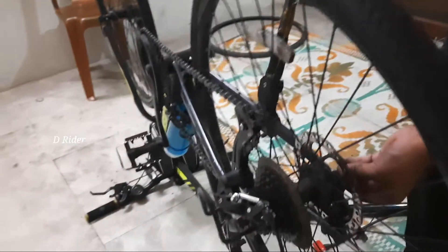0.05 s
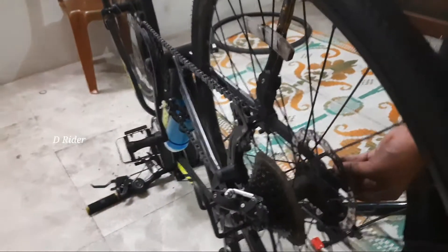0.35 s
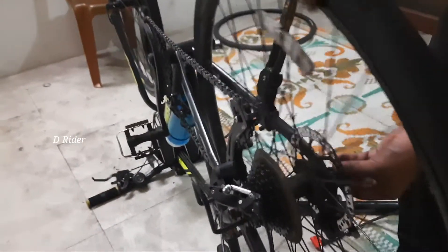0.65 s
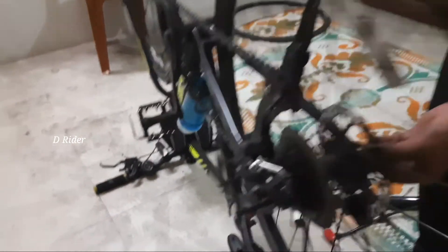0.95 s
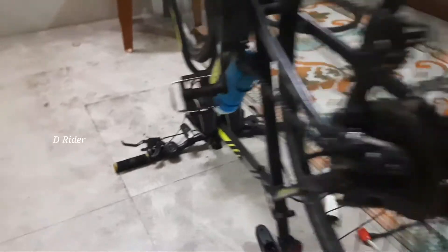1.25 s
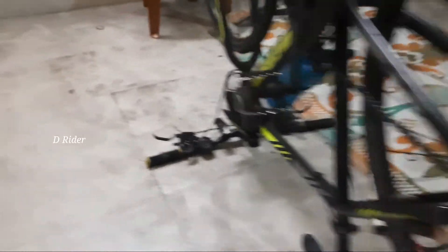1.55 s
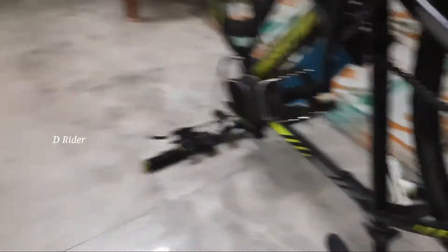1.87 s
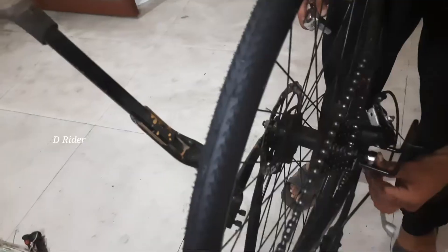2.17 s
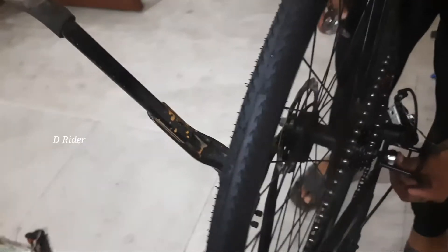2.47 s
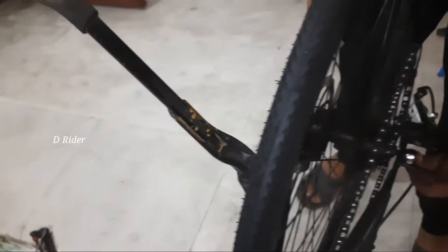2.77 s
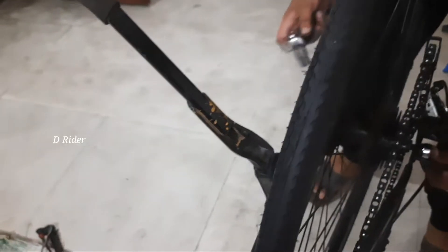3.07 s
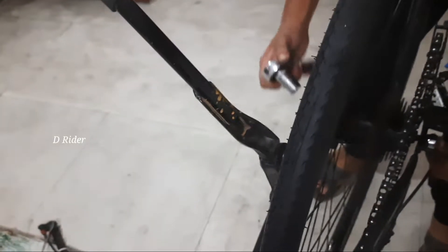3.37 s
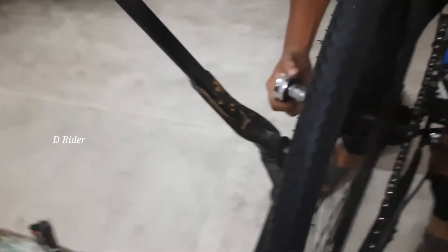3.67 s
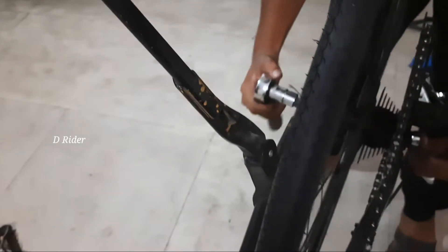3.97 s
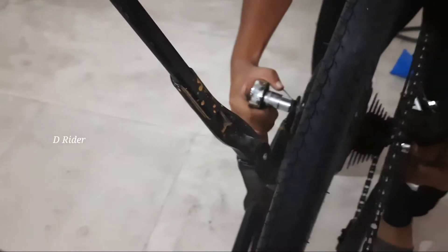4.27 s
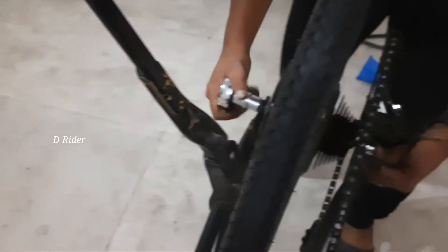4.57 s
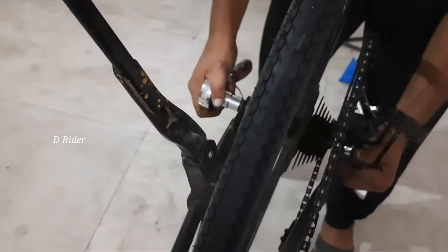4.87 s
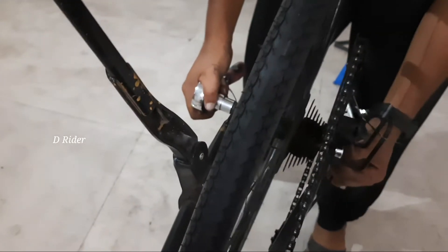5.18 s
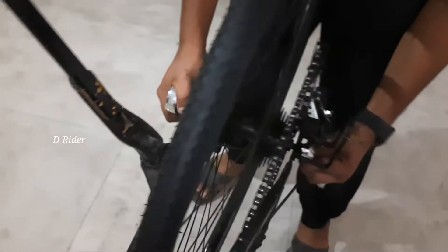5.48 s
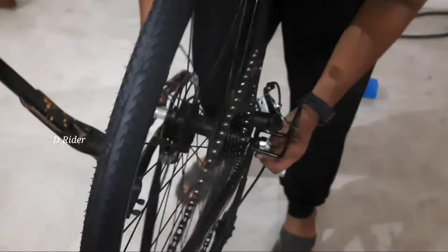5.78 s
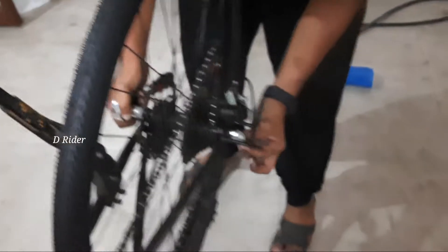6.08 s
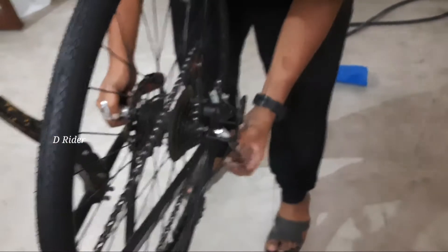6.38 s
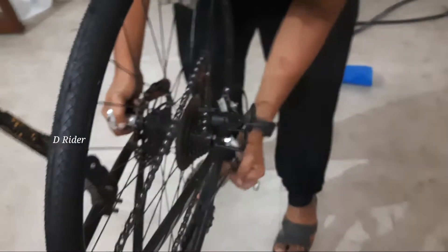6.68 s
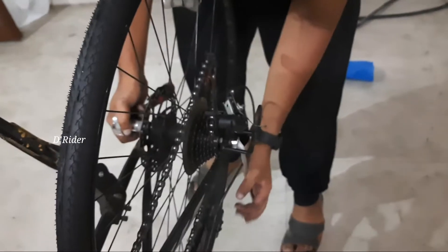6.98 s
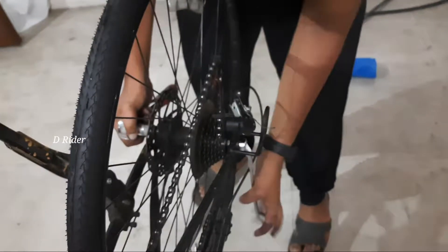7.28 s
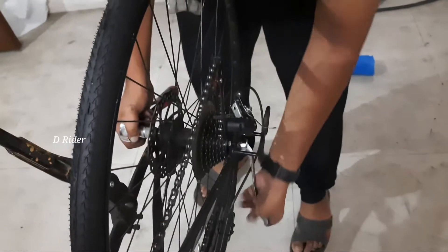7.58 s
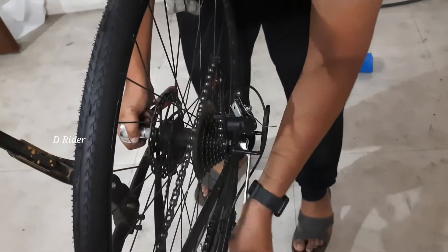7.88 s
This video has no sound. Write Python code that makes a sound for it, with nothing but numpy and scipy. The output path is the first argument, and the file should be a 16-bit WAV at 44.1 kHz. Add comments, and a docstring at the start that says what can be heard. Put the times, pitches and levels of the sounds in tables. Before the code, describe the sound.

Several crisp chain clicks sound near the microphone over a low hum, as hands and tyre rub faintly along a bicycle frame. Traffic rises in the background with a booming motor tone that swells and fades. The axle then lands with a quick cluster of ringing steel knocks, echoing off hard walls. Later the chain and axle click once more beneath the continuing rumble.

```python
"""A rear wheel is worked into an upturned bicycle in a bare, tiled room.
From the start a motor drones behind it, probably traffic outside; the brake disc sings on its pads,
hands and tyre rub along the frame and the chain ticks over the sprockets. After two seconds a broad
rush of traffic swells. Near 3.6 s the axle clacks hard into the frame, and at 6.5 s chain and axle
click once more while the drone goes on."""
import sys
import numpy as np
from scipy import signal
from scipy.fft import rfft, irfft, next_fast_len
from scipy.io import wavfile

SR = 44100
rng = np.random.default_rng(int(sys.argv[2]) if len(sys.argv) > 2 else 0)


def wav_out(sig):
    """Save sig, one row per channel (or a flat mono array), as 16-bit PCM at SR to the path in sys.argv[1]."""
    wavfile.write(sys.argv[1], SR, np.round(np.clip(np.atleast_2d(sig).T, -1, 1) * 32767).astype(np.int16))


N = 354563
T = np.arange(N) / SR
PADDED = next_fast_len(N, real=True)

# the quiet room's tone colour (how strong each pitch is): f/Hz, level/dB
QUIET_COLOUR = [(25, -11), (60, -9.5), (110, 5.5), (170, -4), (260, 0), (380, -4), (560, -11), (760, -16),
                (1050, -11.5), (1500, -21), (2200, -25), (3000, -36), (5000, -44), (15000, -46)]
# its loudness: t/s, level/dB
QUIET_LEVEL = [(0, -45), (1.0, -44), (1.6, -46), (2.0, -47), (8.04, -49)]
# how much noise differs between the ears: f/Hz, unshared minus shared/dB
STEREO_WIDTH = [(60, -14.5), (200, -9), (380, -8), (700, -1.5), (1290, 2), (2400, -0.5), (15000, 0.5)]
# the motor's working cycles per second: t/s, f/Hz
MOTOR_SPEED = [(0, 33.17), (.7, 34.44), (1.2, 35.35), (2.0, 36.5), (2.3, 32.43), (2.9, 32.7), (3.2, 33.84),
               (4.1, 34.64), (5.35, 35.52), (5.8, 34.42), (6.6, 33.33), (8.04, 33.19)]
# the tone at 4 times that speed booms in the room: t/s, level/dB
BOOM_LEVEL = [(0, -53), (2.13, -67), (2.35, -30), (3.05, -30.5), (3.4, -21), (3.53, -29), (3.66, -23.5),
              (4.02, -30), (4.3, -23.5), (4.52, -33.5), (4.68, -24.5), (5.45, -17), (5.67, -23.5),
              (5.8, -20), (6.12, -19), (6.23, -28.5), (6.58, -28.5), (7.05, -45), (7.35, -33.5)]
# the tone at 6 times that speed comes and goes: t/s, level/dB
OVERTONE_LEVEL = [(0, -60), (.55, -50.5), (.96, -43.5), (1.63, -57.5), (2.7, -45), (3.9, -43.5),
                  (4.65, -33.5), (5.9, -53.5), (6.7, -40.5), (8.04, -35.5)]
# weaker motor tones: multiple of the speed, level against RUSH_LEVEL/dB
WEAK_TONES = [(3, -9), (5, -11), (7, -12), (8, -12), (9, -13.5)]
# standing waves, pitches at which the room boosts those weaker tones: f/Hz, width/Hz, boost/dB
STANDING_WAVES = [(109, 1.8, 17), (164.5, 3.5, 7.5)]
# pitch of a deeper hum: t/s, f/Hz
HUM_PITCH = [(0, 63.3), (1.6, 61.65), (3.1, 62.45), (3.6, 69.1), (5.3, 69.74), (6.7, 66.8), (8.04, 68.02)]
# its loudness: t/s, level/dB
HUM_LEVEL = [(0, -38.5), (.13, -42), (.42, -55), (.75, -56), (1.6, -44), (1.72, -59), (2.15, -50),
             (2.43, -27), (2.68, -40), (3.12, -32), (3.26, -39.5), (4.6, -39), (5.33, -43), (5.58, -33.5),
             (6.96, -28.5), (7.12, -35.5), (7.6, -25), (8.04, -43)]
# brake disc squeals: t/s, length/s, first f/Hz, last f/Hz, rise in the middle/Hz, level/dB
SQUEALS = [(-.15, .79, 3660, 3830, 21, -75.5), (.4, .25, 11500, 12200, 380, -77),
           (.77, 0.11, 11000, 10500, 650, -72.5), (1.2, .45, 12350, 12100, 250, -71),
           (2.38, .24, 12400, 12600, 100, -76), (2.62, .42, 12950, 12700, 586, -71)]
# how long the echo takes to fall by 60 dB: f/Hz, fade time/s
ECHO_FADE = [(300, 0.86), (2000, 0.95), (5000, 0.57), (9000, 0.53), (15000, 0.46)]
# hands and tyre on the frame: t/s, hold/s, level/dB, brightness/(dB per octave)
RUBS = [(-.05, 0.037, -74, -3.5), (0.586, .5, -70, -0.5), (1.142, 0.21, -63, 1), (1.48, 0.28, -69, -1),
        (2.126, .01, -66.5, -2.5), (5.235, .01, -66, -4), (6.46, 0.032, -62, -5)]
# their tone colour: f/Hz, level/dB
RUB_COLOUR = [(300, 8), (1500, 12.5), (2500, 10.5), (4000, 3), (6000, 1), (8500, 1.5), (10500, -1.5),
              (12500, 1), (15000, -9)]
# chain links landing: t/s, level/dB, left minus right/dB, brightness/(dB per octave)
TICKS = [(.177, -54, 4, -2), (.446, -53, 3, -1), (.897, -30.5, 0, -1), (.903, -31, 3, 2),
         (1.120, -30, 12, 5), (1.126, -32, -7, 0.5), (1.424, -27, -1, 0.5), (1.442, -31.5, 7, 0.5),
         (1.947, -51.5, -12, -2.5), (1.984, -50, -10, -1), (2.431, -43.5, 0, -6), (3.637, -36.5, 6, -11),
         (3.772, -29.5, 1.5, -2), (3.776, -33, -1, -12), (4.404, -51, 2, -3), (5.041, -40, 9, 4),
         (6.496, -39, 0, -5), (6.505, -41, 1, -2)]
# colour of a tick's crack: f/Hz, level/dB
TICK_COLOUR = [(600, -44), (2000, 0.5), (4000, -9), (6200, -6), (7500, -1), (9000, 1), (11000, -5),
               (12500, 4), (14400, 0), (16000, 6.5)]
# ringing of chain and sprocket: f/Hz, level/dB, fade time/s
TICK_RING = [(6270, 7, 0.021), (7340, -4, .015), (9100, -11, 0.026), (12100, 4, .03), (13400, -11, .03),
             (14350, -11, 0.042)]
# axle blows: t/s, level/dB, left minus right/dB, brightness/(dB per octave)
KNOCKS = [(.900, -43, -4, -7), (1.168, -39.5, -1, -8), (1.200, -48, 3, -13), (3.637, -20, -4, -1.5),
          (3.643, -34, 2, 4), (3.682, -40, 2, 2), (3.729, -31.5, -3, 0), (3.774, -28, 0, 2.5),
          (4.171, -41.5, 0, 1), (4.187, -44, 2, 5), (6.502, -38, 0, -.5)]
# colour of a blow's crack: f/Hz, level/dB
KNOCK_COLOUR = [(300, -15), (900, -2.5), (1600, -5), (2600, -4.5), (3400, -1.5), (4700, -3), (5800, -4.5),
                (7200, -11), (10000, -15), (15000, -20)]
# ringing of the axle and its slot in the frame: f/Hz, level/dB, fade time/s
KNOCK_RING = [(1470, 4, 0.13), (2233, 2.5, 0.22), (2840, -18, 0.13), (3250, 1, 0.13), (3830, -19, 0.25),
              (4660, -10, 0.14), (4840, -1, 0.17), (5645, 0, 0.16), (5790, -6, 0.16)]
# loudness and brightness of the traffic: t/s, level/dB, treble lift/dB
RUSH_LEVEL = [(2.2, -57, 0), (2.33, -41.5, -3), (2.52, -39.5, -0.5), (3.2, -36, -2), (4.6, -32.5, -1),
              (5.2, -30.5, -2), (5.95, -32.5, -3.5), (6.35, -33, 3), (7.25, -35, 3), (7.9, -33.5, 10)]
# its tone colour: f/Hz, level/dB
RUSH_COLOUR = [(22, -31), (48, -3), (90, 2), (170, -2.5), (250, 1), (400, -2), (600, -6), (850, -12.5),
               (1150, -19.5), (2200, -20), (3600, -29), (6500, -39.5), (10000, -42.5), (15000, -44.5)]
# humps the room adds to that colour: f/Hz, width/Hz, boost/dB
RUSH_HUMPS = [(233, 55, 1), (544, 110, 3.5), (671, 44, 2), (1460, 1600, 3), (2240, 68, 2), (3074, 130, 3)]
# bands of rumble, roar, hiss and air: low f/Hz, high f/Hz
RUSH_BANDS = [(230, 800), (900, 2800), (3500, 9000), (10000, 15000)]
# those bands: level against RUSH_LEVEL/dB, share of the treble lift, share of the swell
RUSH_MIX = [(-1.01, 0.17, 0.77), (-9, 0, 0.09), (-22, 0.32, 0.075), (-33.5, 0.78, 0)]
# a rumble swells and passes: peak t/s, length/s, boost/dB
RUMBLE_SWELLS = [(6.15, 1.14, 4.5)]


def undb(db):
    """Turn decibels into a gain."""
    return 10 ** (np.asarray(db) / 20)


def unit(x):
    """Scale a signal to an average power of 1."""
    return x / np.sqrt(np.mean(x ** 2))


def curve(rows, column=1):
    """One column of a table, joined by straight lines in time."""
    rows = np.array(rows)
    return np.interp(T, rows[:, 0], rows[:, column])


def across(points, hz):
    """Read a table between its frequencies, with octaves evenly spaced."""
    f, value = np.transpose(points)
    return np.interp(np.log(hz + 1), np.log(f), value)


def bumps(rows, x):
    """Bell-shaped boosts in dB along frequency or time."""
    return sum(db * np.exp(-(2 * (x - centre) / width) ** 2) for centre, width, db in rows)


def bins(n):
    """Frequencies in the spectrum of n samples."""
    return np.fft.rfftfreq(n, 1 / SR)


def waveform(spectra):
    """Turn spectra back into sound."""
    return irfft(spectra, PADDED)[..., :N]


def wander(rate_hz):
    """A smooth random wobble of typical size 1."""
    noise = rfft(rng.standard_normal(PADDED))
    return unit(waveform(noise * np.exp(-(bins(PADDED) / rate_hz) ** 2)))


def tone(hz, right_lag_rad=0):
    """A pure tone on a moving pitch; the right ear may lag."""
    phase = 2 * np.pi * np.cumsum(hz) / SR
    return np.sqrt(2) * np.sin([phase, phase - right_lag_rad])


def pan(db):
    """Gains that make the left ear db louder than the right."""
    return undb(np.array([[db], [-db]]) / 2)


def room_noise(colour, humps=(), ripple_db=1.66, ripple_hz=22):
    """Noise spectra at two ears: alike in the bass, unrelated in the treble, rippled by standing waves."""
    hz = bins(PADDED)
    ripple = np.interp(hz, np.arange(2000) * ripple_hz, rng.standard_normal(2000))
    db = across(colour, hz) + bumps(humps, hz) + ripple_db * ripple * hz / (hz + 400)
    shared, unshared = rfft(rng.standard_normal((2, PADDED))) * undb(db)
    return shared + np.array([[1], [-1]]) * unshared * undb(across(STEREO_WIDTH, hz))


def band_strength(ears, lo, hi):
    """Strength of what both ears share between two frequencies."""
    inside = (bins(PADDED) > lo) & (bins(PADDED) < hi)
    return np.std(waveform(ears.mean(axis=0) * inside))


def quiet_room(flicker_db=1.0):
    """The faint, steady noise of the room."""
    noise = unit(waveform(room_noise(QUIET_COLOUR)))
    return noise * undb(curve(QUIET_LEVEL) + flicker_db * wander(7.9))


def motor(waver=.003, boom_drift_db=1.43, hum_drift_db=0.8, weak_drift_db=3.0):
    """Tones at multiples of a motor's speed, and a deep hum; standing waves make them swell and fade."""
    hz = curve(MOTOR_SPEED) * (1 + waver * wander(10.8))
    boom = tone(4 * hz, .2) * undb(curve(BOOM_LEVEL) + boom_drift_db * wander(11))
    hum_hz = curve(HUM_PITCH) * (1 + waver * wander(4.4))
    hum = tone(hum_hz, .24) * undb(curve(HUM_LEVEL) + hum_drift_db * wander(4.9))
    overtone = tone(6 * hz + wander(5.7), .35) * undb(curve(OVERTONE_LEVEL))
    out = pan(0.43) * boom + pan(-1.8) * hum + overtone
    for multiple, db in WEAK_TONES:
        level_db = curve(RUSH_LEVEL) + db + bumps(STANDING_WAVES, multiple * hz)
        out += tone(multiple * hz + wander(8.05)) * undb(level_db + weak_drift_db * wander(0.76))
    return out


def brake_disc(waver=.004, jitter=0.0128, chatter_db=3.0):
    """The disc grazes its pads; each thin squeal rises and falls with the pressure."""
    out = 0
    for start, length, first_hz, last_hz, rise_hz, db in SQUEALS:
        along = np.clip((T - start) / length, 0, 1)
        pressure = 4 * along * (1 - along)
        hz = first_hz + (last_hz - first_hz) * along + rise_hz * pressure
        hz *= 1 + waver * wander(10) + jitter * wander(200)
        squeal = unit(tone(hz)[0] * undb(chatter_db * wander(25)))
        out += squeal * np.sqrt(pressure) * undb(db)
    return out


def wall_echo(sound, build_s=0.0022):
    """Tiles and bare walls give a dense echo, different at each ear, whose treble dies first."""
    t = T[:SR]
    noise, tail = rfft(rng.standard_normal((2, SR))), 0
    for khz in range(16):
        band = irfft(noise * (bins(SR) // 1000 == khz), SR)
        fade_s = across(ECHO_FADE, 1000 * khz + 500)
        tail += band * undb(-60 * t / fade_s)
    tail = unit(tail * (1 - np.exp(-t / build_s))) / np.sqrt(SR)
    return signal.fftconvolve(sound[None], tail, axes=1)[:, :N]


def rubbing(rise_s=0.068, fall_s=.11, grain_db=0.7):
    """Hands and tyre slide along the frame; each soft, grainy rub rises, holds and dies away."""
    octaves = np.log2(np.maximum(bins(PADDED), 1000) / 7000)  # brightness tilts around 7000 Hz
    out = 0
    for start, hold, db, bright_db in RUBS:
        ears = room_noise(RUB_COLOUR) * undb(bright_db * octaves)
        rub = waveform(ears) / band_strength(ears, 4500, 11000)
        rise = np.clip((T - start) / rise_s, 0, 1)
        fall = np.exp(-np.maximum(T - start - rise_s - hold, 0) / fall_s)
        out += rub * undb(db) * rise * fall
    return out * undb(grain_db * wander(60))


def steel_hits(rows, colour, ring_tones, crack_s, ring_db, size=8192):
    """Steel on steel cracks, then rings. Returns the direct sound and what goes to the walls."""
    # build a filter with this colour that sounds only after the blow
    cepstrum = irfft(np.log(undb(across(colour, bins(1024)))))
    cepstrum[1:512] *= 2
    cepstrum[513:] = 0
    response = irfft(np.exp(rfft(cepstrum)))
    t = T[:size]
    direct, to_walls = np.zeros((2, N + size)), np.zeros(N + size)
    blow_gain = np.sqrt(.002 * SR / size)  # as much energy as 2 ms at the hit's level
    octaves = np.log2(np.maximum(bins(size), 1500) / 1500)
    for s, db, pan_db, bright_db in rows:
        burst = rng.standard_normal((2, size)) * np.exp(-t / crack_s)
        crack = signal.fftconvolve(burst, response[None], axes=1)[:, :size]
        ring = 0
        for hz, tone_db, fade_s in ring_tones:
            # every blow lands elsewhere and mixes the tones anew
            strength = undb(tone_db) * rng.normal(1, 0.83, (2, 1))
            hz *= rng.normal(1, 0.0027)
            ring += strength * np.sin(2 * np.pi * hz * t) * undb(-60 * t / fade_s)
        hit = unit(crack) + undb(ring_db) * unit(ring)
        hit = irfft(rfft(hit) * undb(bright_db * octaves))  # a softer contact is duller
        hit = unit(hit) * blow_gain * undb(db)
        start = int(s * SR)
        direct[:, start:start + size] += pan(pan_db) * hit
        to_walls[start:start + size] += hit[0]
    return direct[:, :N], to_walls[:N]


def chain_ticks():
    """Links drop on the sprocket's teeth, too small and too tightly held to ring much."""
    return steel_hits(TICKS, TICK_COLOUR, TICK_RING, crack_s=.0029, ring_db=-18)


def axle_knocks():
    """Axle and nut strike the frame and ring briefly."""
    return steel_hits(KNOCKS, KNOCK_COLOUR, KNOCK_RING, crack_s=.0032, ring_db=-11)


def traffic_rush(flicker_db=0.76, fade_in_s=(2.22, 2.33)):
    """Traffic roars: its bands swell together and flicker alone, and the treble lifts late on."""
    ears = room_noise(RUSH_COLOUR, RUSH_HUMPS)
    edges, out = np.ravel(RUSH_BANDS), 0
    treble_db, swell_db = curve(RUSH_LEVEL, column=2), bumps(RUMBLE_SWELLS, T)
    for k, (band_db, treble_share, swell_share) in enumerate(RUSH_MIX):
        # 1 inside this band, sloping to 0 at its neighbours
        window = np.interp(bins(PADDED), edges, np.arange(len(edges)) // 2 == k)
        band = waveform(ears * window) / band_strength(ears, *RUSH_BANDS[k])
        db = curve(RUSH_LEVEL) + band_db + treble_share * treble_db + swell_share * swell_db
        out += band * undb(db + flicker_db * wander(14.5))
    return out * np.interp(T, fade_in_s, [0, 1])


def scene():
    """The bicycle close by, its echo in the room, and the drone behind."""
    chain, chain_to_walls = chain_ticks()
    axle, axle_to_walls = axle_knocks()
    squeal = brake_disc()
    # the walls throw the echo of chain and disc further left than the axle's
    echo = pan(2) * wall_echo(undb(0.5) * chain_to_walls + undb(2) * squeal)
    echo += pan(0.5) * wall_echo(undb(3) * axle_to_walls)
    return chain + axle + squeal + echo + rubbing() + motor() + traffic_rush() + quiet_room()


def record(dry, top_hz=15300):
    """Cut away the highest treble."""
    return signal.sosfilt(signal.ellip(10, .2, 80, top_hz, fs=SR, output="sos"), dry)


dry = scene()
out = record(dry)
wav_out(out)
```